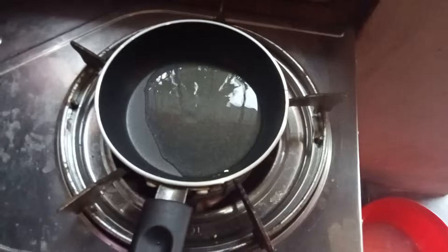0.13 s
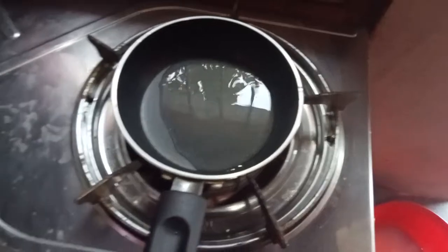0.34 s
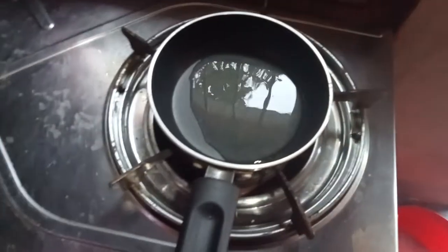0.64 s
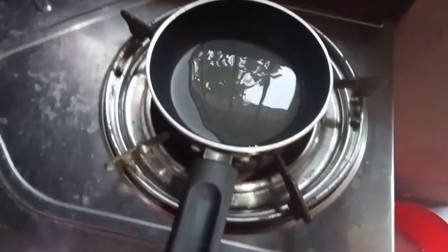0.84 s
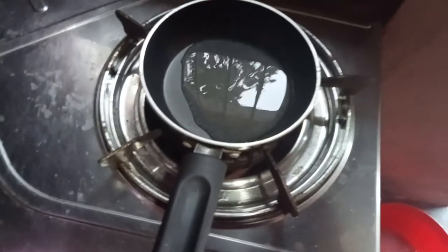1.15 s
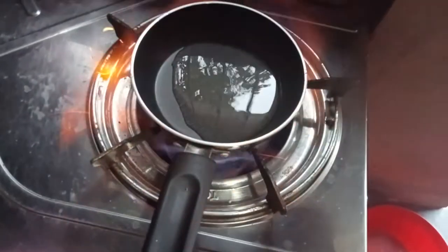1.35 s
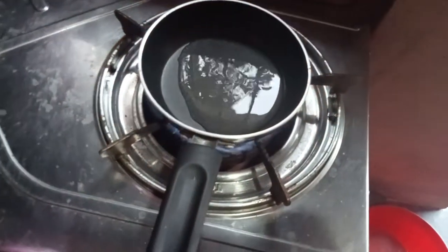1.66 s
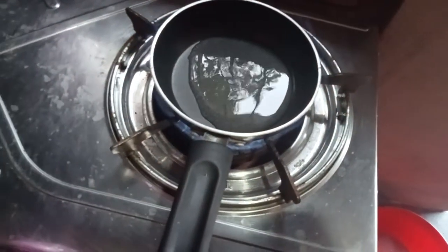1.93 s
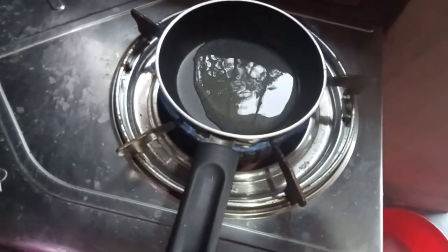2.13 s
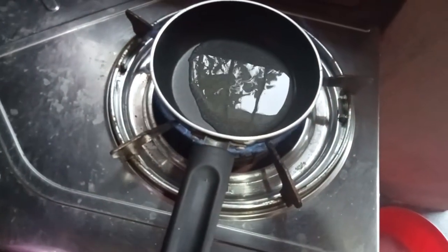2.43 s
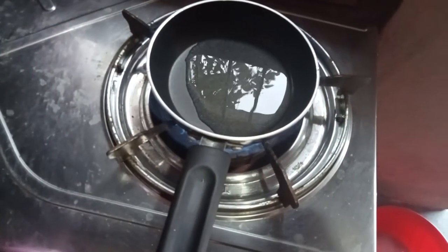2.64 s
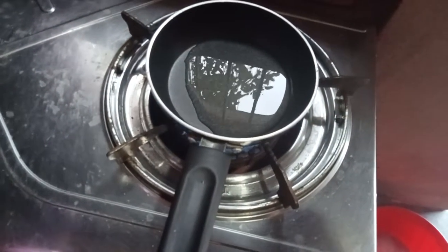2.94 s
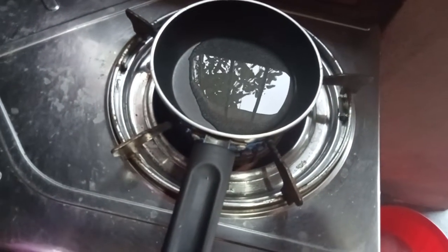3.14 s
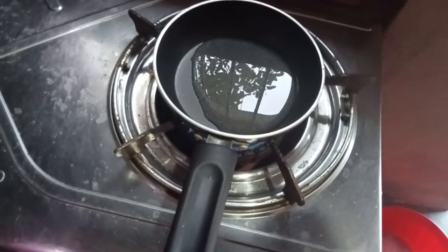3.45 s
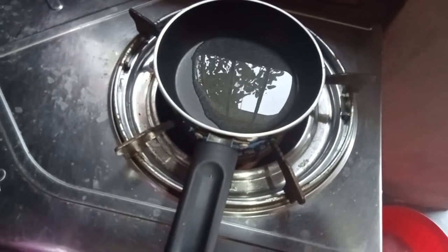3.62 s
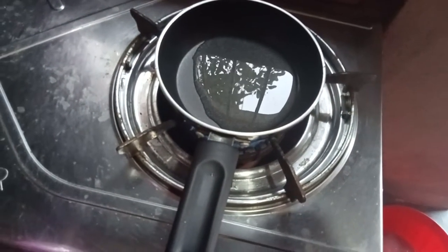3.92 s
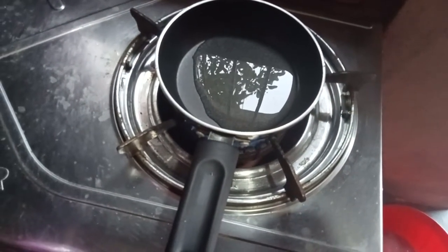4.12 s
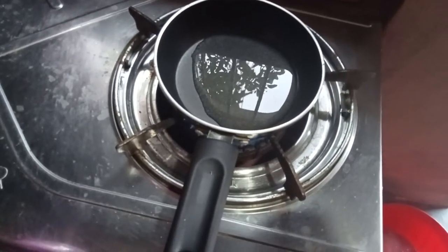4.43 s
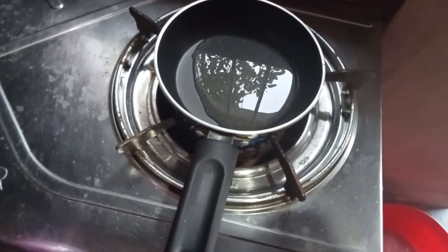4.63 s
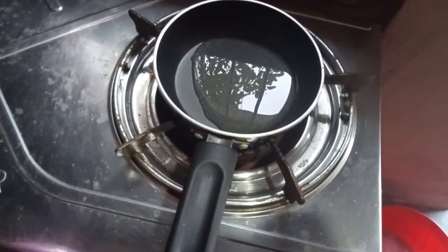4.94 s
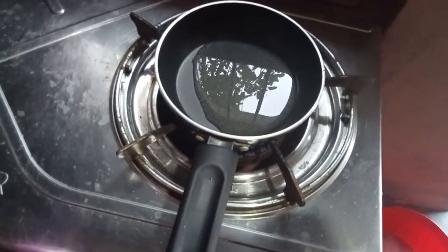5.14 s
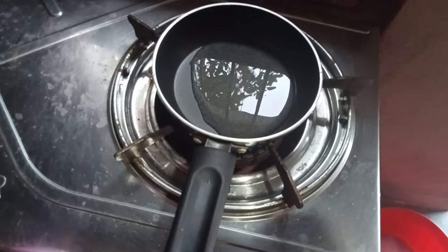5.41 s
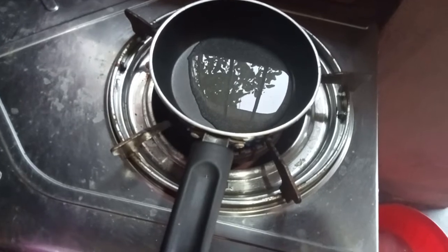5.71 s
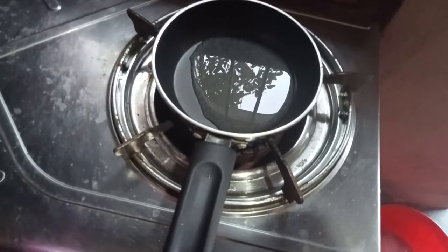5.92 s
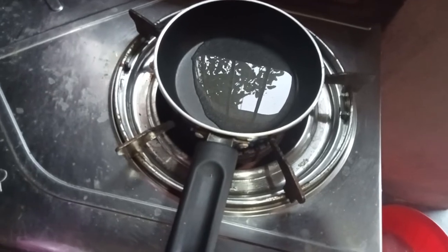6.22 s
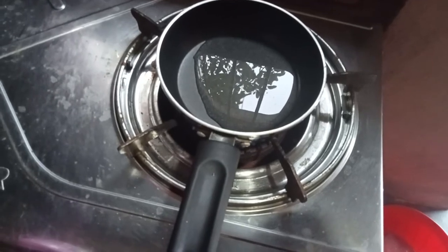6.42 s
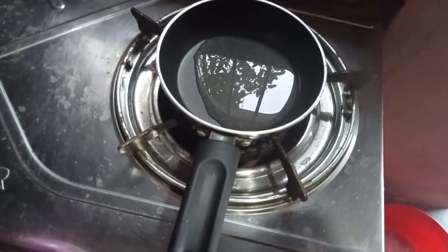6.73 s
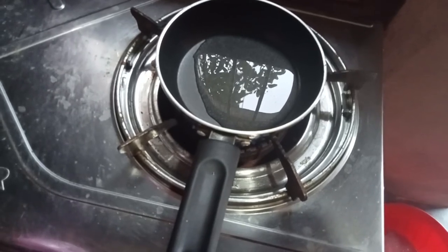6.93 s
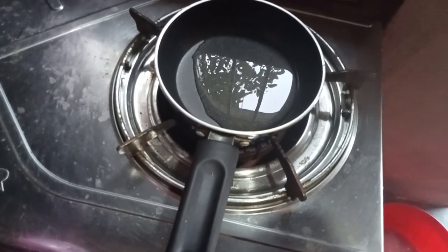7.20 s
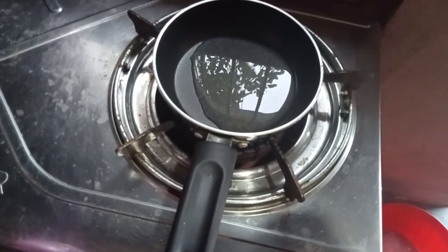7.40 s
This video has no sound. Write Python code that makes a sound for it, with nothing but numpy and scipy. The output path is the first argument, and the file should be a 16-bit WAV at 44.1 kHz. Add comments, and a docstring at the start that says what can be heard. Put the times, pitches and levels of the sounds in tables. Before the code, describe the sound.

The sound fades in from silence over soft indoor air and a faint low hum. From about 0.3 seconds gas hiss climbs, full by 0.9, bright and airy with a thin whistle near 6 kHz; a faint knock falls at 0.5 and a small metal tick at 1.17. At 1.29 the igniter snaps extremely loudly, two blows almost fused, with dense clanging steel ring. At 1.39 gas catches in a deep, short whump and low roar. A firm dull knob knock comes at 1.57 as the ringing is damped. Flame and hiss sink through 2 to 4 seconds, leaving quiet air. Birds outside whistle, chip and squawk hoarsely from about 1.1 onward, clearer after the ignition, sparser around 4 to 4.8, livelier from 5.2 to 6.3, and continuing to 7.5. Faint handling knocks occur at 2.65 and 3.9; tiny bright ticks cluster at 7.1 to 7.3.

```python
"""In a home kitchen, a gas stove is lit under a small pan; birds call outside.
Gas hiss and jet whistles are filtered noise that swells and dies with the flow. The igniter's blows are
bursts of dense ringing plus steel modes; the flame is a whump of air modes and a roar of low noise.
Whistles, chips, chirps and squawks are gliding tones with random jitter, smeared by a room tail.
Knob, pan and metal add short bursts of noise, over a soft background with drones and a low hum."""
import sys
import numpy as np
from scipy import signal
from scipy.fft import rfft, irfft
from scipy.io import wavfile
from scipy.ndimage import uniform_filter1d, minimum_filter1d

SR = 44100
rng = np.random.default_rng(int(sys.argv[2]) if len(sys.argv) > 2 else 0)


def store_pcm(level_fs):
    """Save levels as 16-bit WAV."""
    pcm = np.round(np.clip(level_fs, -1, 1) * 32767).astype(np.int16)
    wavfile.write(sys.argv[1], SR, np.atleast_2d(pcm).T)


N = 333396
TIME = np.arange(N) / SR

# soft air of house and yard: f/Hz, level/dB per Hz
AIR_COLOUR = [(25, -22.5), (45, -15), (65, -3.5), (160, -2), (350, -5.5), (600, -8), (950, -11),
              (1550, -12), (2100, -10), (3400, -13), (5000, -17.5), (7800, -19), (9000, -31), (15500, -31)]
# narrow bands that sing in the background: f/Hz, width/Hz, level/dB
DRONE_BANDS = [(120.4, 14, -80), (287.7, 36, -79), (645.8, 40, -85), (734, 30, -85), (1270, 200, -77.5),
               (4510, 130, -79), (5580, 180, -80.5)]
AIR_DB = -64
# one lull in the air and drones
LULL_S, LULL_WIDTH_S, LULL_DB = 4.45, 0.51, -3.5
# the low hum holds briefly, then sinks to a faint floor
HUM_HZ, HUM_DB, HUM_EASE_S, HUM_FALL_DB_PER_S, HUM_STEADY_DB = 68, -68.5, 0.6, 25, -83

# whistling resonances of the jet and mixing tube: f/Hz, width/Hz, level/dB
JET_RESONANCES = [(1107.4, 430, -13.5), (1920, 140, -17), (2470, 300, -15), (3141, 230, -19),
                  (4320, 150, -13), (5380, 170, -14), (5914, 240, 0), (6180, 140, -8.5), (7000, 1000, -11),
                  (11380, 540, -17.5), (12970, 1800, -16)]
# broad hiss of the gas: f/Hz, level/dB per Hz
HISS_COLOUR = [(300, -13.5), (1000, -5), (3600, -6.5), (5000, 0), (7500, 3), (9000, -11.5), (10200, -12),
               (15500, -8)]
# thin sizzle of the burner ports: f/Hz, width/Hz, level/dB
PORT_BANDS = [(11290, 500, 0.5)]
# the valve opens, the flow stays full for a while, then dies down to a faint steady hiss
GAS_FULL_S, GAS_EASE_S, GAS_DB, GAS_STEADY_DB = 0.94, 1.5, -55, -83
GAS_RISE_DB_PER_S, GAS_FALL_DB_PER_S = 28.5, 6.5
# the ports sizzle from the whump until the flame has settled, then fade
PORTS_DB, PORTS_SETTLED_S, PORTS_FALL_DB_PER_S = -69.5, 2.35, 32

# dull knocks of knob and pan: t/s, level/dB
KNOCK_HITS = [(0.505, -57), (1.569, -33), (2.653, -54.5), (3.901, -57.5), (3.935, -60.5)]
KNOCK_HZ, KNOCK_OCTAVES, KNOCK_T60_S = 2100, 0.59, 0.11
# tiny bright ticks of the metal: t/s, level/dB, f/Hz
METAL_TICKS = [(1.167, -49, 8900), (3.903, -62, 10930), (7.070, -65.5, 13500), (7.161, -50, 13500),
               (7.240, -62, 7000), (7.279, -58, 6370)]
TICK_OCTAVES, TICK_T60_S = 0.3, 0.0195

# hoarse squawks: t/s, length/s, middle f/Hz, level/dB, rasp/0-1, level step per overtone/dB
SQUAWK_CALLS = [(1.097, 0.075, 2905, -52, 0.68, 1), (1.768, 0.054, 1928, -51, 0.98, 0),
                (2.92, .12, 2273, -56, 0.76, 2.5), (3.021, .053, 2398, -47.5, 0.79, 0),
                (3.251, .1, 3540, -56.5, 0.52, -4.5), (3.34, .058, 2056, -54.5, .9, -17),
                (3.605, 0.067, 3870, -57, 0.87, -14), (4.332, 0.076, 2130, -62, .7, -17),
                (5.201, 0.036, 3947, -48, 0.02, -1), (5.218, 0.06, 2990, -53.5, 0.93, -5.5),
                (5.7, .25, 1990, -62.5, .7, -3), (5.82, 0.19, 4650, -63, 1, -8),
                (5.975, 0.059, 2010, -52.5, 0.97, 1.5), (6.124, 0.087, 4610, -56, 0.75, -17),
                (6.163, 0.038, 2936, -52, 0.64, -7.5), (6.182, 0.077, 3690, -52, 0.75, -3.5),
                (7.505, 0.062, 3275, -53, 0.5, -7)]
SQUAWK_FALL_OCTAVES = 0.28  # at full rasp
# sliding whistles: t/s, length/s, held f/Hz, start above held pitch/octaves, level/dB, rasp/0-1
WHISTLE_CALLS = [(1.1, .22, 4570, -0.12, -54.5, 0.27), (1.424, .18, 4411, 0, -52, 0.07),
                 (1.827, .11, 3800, 0.021, -56, 0.14), (1.911, 0.17, 4930, -0.21, -57.5, 0.21),
                 (2.2, .12, 3600, 0.1, -57, 0.37), (2.51, 0.21, 3970, .06, -60, .6),
                 (2.73, 0.24, 4040, -.04, -62, 0.68), (2.839, 0.085, 2480, 0.034, -60.5, 0.48),
                 (3.079, 0.08, 2420, .03, -61.5, 0.5), (3.119, .1, 2800, -.05, -61.5, 0.52),
                 (4.334, 0.068, 1323, 0.058, -67.5, .4), (4.638, .13, 2000, 0.2, -66, 0.33),
                 (4.801, .16, 1930, 0.34, -65.5, 0.46), (4.845, 0.34, 4690, -.2, -58, .26),
                 (5.253, 0.2, 4250, 0.13, -65, .35), (5.273, 0.038, 2206, 0.11, -63, .15),
                 (5.485, 0.21, 3900, .015, -64, 0.15), (5.602, 0.15, 5170, -.42, -54.5, 0.13),
                 (5.893, .12, 3740, -.04, -54, 0.7), (6.209, 0.068, 4003, -0.011, -52.5, 0.36),
                 (6.299, 0.54, 3800, 0.069, -66, 0.6), (6.35, 0.49, 3000, 0.11, -71, 0.6),
                 (6.978, .11, 2865, 0.047, -62.5, 0.8), (7.156, 0.15, 3730, 0.0035, -60, 0.22),
                 (7.311, .12, 4400, 0.17, -57.5, .23), (7.399, .12, 3200, -0.06, -66.5, 0.87)]
SLIDE_SHARE = 0.55  # share of a whistle that the slide takes
# short falling chips: t/s, last f/Hz, level/dB
CHIP_CALLS = [(1.648, 4480, -52), (1.832, 2980, -53.5), (2.36, 4030, -62), (2.401, 2750, -57),
              (2.535, 3340, -58.5), (2.665, 3240, -57), (2.865, 3120, -57), (3.22, 2980, -58),
              (3.29, 2686, -49.5), (3.645, 2520, -52), (5.185, 4470, -48.5), (6.236, 2595, -54),
              (6.858, 2800, -56.5), (6.93, 2240, -62.5), (6.975, 1780, -62)]
CHIP_S, CHIP_FALL_OCTAVES, CHIP_CURVE, CHIP_RASP = 0.052, 0.24, 1.6, 0.21
# husky rising chirps, all around one pitch: t/s, level/dB
CHIRP_CALLS = [(5.155, -54.5), (6.769, -67), (6.894, -56.5), (7.079, -57)]
CHIRP_S, CHIRP_HZ, CHIRP_RISE_OCTAVES, CHIRP_RASP = 0.066, 4880, 0.168, 0.52

# blows of the igniter's spring hammer: t/s, level/dB
HAMMER_BLOWS = [(1.288, -0.5), (1.294, 0)]
# dense ring of the stove body: f/Hz, level/dB per Hz, t60/s
BODY_RING = [(80, -23.5, 0.22), (300, -15, 0.54), (840, -13, .3), (1360, -11, 0.3), (1990, -5, 0.19),
             (2680, 0, 0.21), (4200, -4, 0.13), (5300, -4.5, 0.16), (6128, -9, 0.16), (7180, 3, .14),
             (9570, -13, 0.15), (13130, -8.5, 0.17), (15500, -15.5, 0.15)]
# modes of the igniter's spring, stove top, pan support and pan: f/Hz, level/dB, t60/s
STEEL_MODES = [(500, -8, 0.39), (1626, -15, 0.2), (1835, -5, 0.13), (1887, 0.5, 0.24), (1943, -12, 0.25),
               (2050, -7, .14), (2322, -2.5, .17), (2485, -16, 0.6), (2674, -5, 0.25), (2821, -5, .17),
               (3120, -4, 0.11), (3445, -7, 0.15), (3636, -23.5, 0.79), (3930, -10, .17), (4650, -6, 0.14),
               (5180, -9, .18), (6655, -9, .17), (7067, 0, 0.093), (7327, -2, .12), (7836, -1, .1),
               (8397, -8, 0.11), (9800, -9, .12), (11350, -22, 0.43), (13000, -9, 0.11), (13651, -7, .12)]

# air modes around the burner as the gas catches: f/Hz, level/dB, t60/s
WHUMP_MODES = [(113, 1.5, 0.19), (142, -17, 0.19), (218, -0.5, 0.14), (263.2, 0, 0.21), (328, -13, 0.1),
               (509.2, -21, 0.51)]
# colour of the roar: f/Hz, level/dB per Hz
ROAR_COLOUR = [(30, -25), (85, -17), (125, 2), (170, -9), (260, -16.5), (500, -21.5), (1000, -25),
               (3000, -56)]
WHUMP_S = 1.385
# a flare leaps up with the whump and dies quickly, leaving a softer burn that fades more slowly
FLAME_DB, FLAME_RISE_DB_PER_S, FLAME_FALL_DB_PER_S = -35, 2200, 48.5
BURN_DB, BURN_FALL_DB_PER_S = -55.5, 16.5

# reverberation of the kitchen: f/Hz, t60/s
KITCHEN_T60 = [(200, 0.25), (2000, 0.46), (5000, 0.4), (12000, .25)]
FADE_IN_S, FADE_IN_RISE_S = 0.11, 0.21  # silent until the first, then opening with the second
EDGE_HZ = 15650  # upper edge of the whole sound


def gain_of(db):
    """Decibels to amplitude."""
    return 10 ** (np.asarray(db) / 20)


def evened(x):
    """Scales to an rms of one."""
    return x / np.sqrt(np.mean(x ** 2) + 1e-20)


def read(points, hz):
    """Reads a table along a log-frequency axis."""
    f, value = np.transpose(points)
    return np.interp(np.log(hz + 1), np.log(f), value)


def add(mix, s, sound):
    """Mixes a sound in at time s."""
    part = mix[round(s * SR):][:len(sound)]
    part += sound[:len(part)]


def noise(shape, size=N):
    """Noise of unit rms whose amplitude spectrum follows shape(Hz)."""
    spectrum = rfft(rng.standard_normal(size))
    return evened(irfft(spectrum * shape(np.fft.rfftfreq(size, 1 / SR)), size))


def coloured(colour, size=N):
    """Noise of unit rms with the colour of a table."""
    return noise(lambda hz: gain_of(read(colour, hz)), size)


def wander(rate_hz, size=N):
    """Smooth random drift, mostly slower than the given rate."""
    return noise(lambda hz: 1 / (1 + (hz / rate_hz) ** 4), size)


def fuzzy(bands):
    """Noise ringing in a set of resonances."""
    out = np.zeros(N)
    for centre, width, db in bands:
        out += gain_of(db) * noise(lambda hz: 1 / (1 + ((hz - centre) / (width / 2)) ** 2))
    return out


def mottled(x, patchy_db):
    """Lets small patches of the spectrum swell and fade on their own."""
    z = signal.stft(x, nperseg=1024, noverlap=768)[2]
    patches = uniform_filter1d(rng.standard_normal(z.shape), size=4, axis=0)  # across frequency
    patches = evened(uniform_filter1d(patches, size=14, axis=1))  # along time
    return signal.istft(z * gain_of(patchy_db * patches), nperseg=1024, noverlap=768)[1][:N]


def swell(full_s, ease_s, rise_db_per_s, fall_db_per_s):
    """Gain that climbs to one at full_s, holds until ease_s, then dies away."""
    rise_db = -rise_db_per_s * np.maximum(full_s - TIME, 0)
    fall_db = -fall_db_per_s * np.maximum(TIME - ease_s, 0)
    return gain_of(rise_db + fall_db)


def onset(rise_s):
    """One second of gain that opens with the given time constant."""
    return 1 - np.exp(-TIME[:SR] / rise_s)


def dying(colour, t60s):
    """One second of dense ringing of unit energy, each band dying at its own speed."""
    hz, t, z = signal.stft(coloured(colour, SR), SR, nperseg=256)
    decay_db = -60 * t / read(t60s, hz)[:, None]
    tail = signal.istft(z * gain_of(decay_db), SR, nperseg=256)[1][:SR]
    return tail / np.linalg.norm(tail)


def ring(modes):
    """One second of struck modes: decaying sines with random phases."""
    t = TIME[:SR]
    out = np.zeros(SR)
    for hz, db, t60 in modes:
        out += gain_of(db - 60 * t / t60) * np.sin(2 * np.pi * (hz * t + rng.random()))
    return out


def contact(centre_hz, octaves, t60):
    """A short, damped burst of noise in one band."""
    t = TIME[:SR // 4]
    burst = noise(lambda hz: 1 / (1 + (np.log2((hz + 1) / centre_hz) / octaves) ** 6), size=len(t))
    return burst * gain_of(-60 * t / t60)


def progress(length):
    """Runs from 0 to 1 over a note."""
    return np.linspace(0, 1, max(round(length * SR), 64))


def syrinx(hz, jitter, jitter_hz):
    """Phase of one note: its pitch curve, shaken by random jitter."""
    return 2 * np.pi * np.cumsum(hz * (1 + jitter * wander(jitter_hz, size=len(hz)))) / SR


def harsh_note(hz, rasp, slope_db, jitter=0.14, taper=0.6, shake=0.4):
    """Three partials whose pitch and strength shake so fast that each spreads into a band."""
    phase = syrinx(hz, jitter * rasp, jitter_hz=604)
    stack = np.sin(phase) + gain_of(slope_db) * np.sin(2 * phase)
    stack += gain_of(2 * slope_db - 4) * np.sin(3 * phase)
    shaken = stack * (1 + shake * wander(200, size=len(hz)))
    return evened(shaken) * signal.windows.tukey(len(hz), taper)


def pure_note(hz, rasp, jitter=0.056, overtone_db=-26, taper=0.3, quaver_db=9):
    """A note with a faint octave, from pure to husky; the husky ones quaver in strength."""
    phase = syrinx(hz, jitter * rasp, jitter_hz=256.5)
    quaver = gain_of(quaver_db * rasp * wander(35, size=len(hz)))
    tone = np.sin(phase) + gain_of(overtone_db) * np.sin(2 * phase)
    return evened(quaver * tone) * signal.windows.tukey(len(hz), taper)


def background(flutter_db=0.43):
    """Soft rumble and air of the house and the yard, with faint drones and a sinking hum."""
    air = gain_of(AIR_DB) * coloured(AIR_COLOUR) + fuzzy(DRONE_BANDS)
    lull_db = LULL_DB * np.exp(-((TIME - LULL_S) / LULL_WIDTH_S) ** 2)
    air_gain = gain_of(flutter_db * wander(5.3) + lull_db)
    hum_gain = gain_of(HUM_DB - HUM_FALL_DB_PER_S * np.maximum(TIME - HUM_EASE_S, 0))
    hum_gain += gain_of(HUM_STEADY_DB)
    hum = hum_gain * np.sin(2 * np.pi * HUM_HZ * TIME + 0.5 * wander(4.9))
    return air_gain * mottled(air, patchy_db=2.5) + hum


def gas(hiss_db=-3):
    """Turbulence at the jet: fuzzy whistles and broad hiss follow the flow; the lit ports sizzle."""
    flow = gain_of(GAS_DB) * swell(GAS_FULL_S, GAS_EASE_S, GAS_RISE_DB_PER_S, GAS_FALL_DB_PER_S)
    flow = np.maximum(flow, gain_of(GAS_STEADY_DB))
    jet = fuzzy(JET_RESONANCES) + gain_of(hiss_db) * coloured(HISS_COLOUR)
    ports_gain = swell(WHUMP_S, PORTS_SETTLED_S, FLAME_RISE_DB_PER_S, PORTS_FALL_DB_PER_S)
    ports = gain_of(PORTS_DB) * ports_gain * fuzzy(PORT_BANDS)
    return mottled(flow * jet + ports, patchy_db=2.0)


def knocks():
    """Knob and pan knock dully: damped noise bursts in one middle band."""
    out = np.zeros(N)
    for s, db in KNOCK_HITS:
        add(out, s, gain_of(db) * contact(KNOCK_HZ, KNOCK_OCTAVES, KNOCK_T60_S))
    return out


def squawks():
    """Hoarse calls: the rougher they are, the more they sag in pitch."""
    out = np.zeros(N)
    for s, length, hz, db, rasp, slope_db in SQUAWK_CALLS:
        pitch = hz * 2 ** (SQUAWK_FALL_OCTAVES * rasp * (0.5 - progress(length)))
        add(out, s, gain_of(db) * harsh_note(pitch, rasp, slope_db))
    return out


def whistles():
    """Notes that slide onto their pitch and hold it."""
    out = np.zeros(N)
    for s, length, hz, slide, db, rasp in WHISTLE_CALLS:
        remaining = np.maximum(1 - progress(length) / SLIDE_SHARE, 0)
        pitch = hz * 2 ** (slide * remaining ** 2)
        add(out, s, gain_of(db) * pure_note(pitch, rasp))
    return out


def ticks():
    """The metal ticks: very short noise bursts in narrow, bright bands."""
    out = np.zeros(N)
    for s, db, hz in METAL_TICKS:
        add(out, s, gain_of(db) * contact(hz, TICK_OCTAVES, TICK_T60_S))
    return out


def igniter(body_db=26, modes_db=-9, crack_db=7, crack_s=0.0066, release_s=1.57, damping_db_per_s=250):
    """The hammer strikes with a hard crack, then the steel rings until the knob is let go."""
    out, body = np.zeros(N), np.array(BODY_RING)
    strike = onset(0.0016) * (1 + gain_of(crack_db) * np.exp(-TIME[:SR] / crack_s))
    for s, db in HAMMER_BLOWS:
        add(out, s, gain_of(db + body_db) * dying(body[:, :2], body[:, ::2]) * strike)
    first_blow_s = HAMMER_BLOWS[0][0]
    add(out, first_blow_s, gain_of(modes_db) * ring(STEEL_MODES) * onset(0.003))
    return out * gain_of(-damping_db_per_s * np.clip(TIME - release_s, 0, 1))


def flame(whump_db=-16, spread_s=0.0063, flutter_db=1.0):
    """The pooled gas catches at once and rings the air under the pan; the roar then dies away."""
    lit_s = WHUMP_S + spread_s
    flare = gain_of(FLAME_DB) * swell(lit_s, lit_s, FLAME_RISE_DB_PER_S, FLAME_FALL_DB_PER_S)
    burn = gain_of(BURN_DB) * swell(lit_s, lit_s, FLAME_RISE_DB_PER_S, BURN_FALL_DB_PER_S)
    out = (flare + burn) * gain_of(flutter_db * wander(3.4)) * coloured(ROAR_COLOUR)
    add(out, WHUMP_S, gain_of(whump_db) * ring(WHUMP_MODES) * onset(0.0015))
    return out


def chips(overtone_db=-19):
    """Short notes that all drop alike onto their last pitch."""
    out = np.zeros(N)
    for s, hz, db in CHIP_CALLS:
        pitch = hz * 2 ** (CHIP_FALL_OCTAVES * (1 - progress(CHIP_S)) ** CHIP_CURVE)
        add(out, s, gain_of(db) * harsh_note(pitch, CHIP_RASP, overtone_db))
    return out


def chirps(overtone_db=-20):
    """Husky notes that all rise alike through one middle pitch."""
    out = np.zeros(N)
    for s, db in CHIRP_CALLS:
        pitch = CHIRP_HZ * 2 ** (CHIRP_RISE_OCTAVES * (progress(CHIRP_S) - 0.5))
        add(out, s, gain_of(db) * harsh_note(pitch, CHIRP_RASP, overtone_db))
    return out


def through_window(x, corner_hz=8200):
    """Distance and the window opening take off the top treble."""
    hz = np.fft.rfftfreq(N, 1 / SR)
    return irfft(rfft(x) / np.sqrt(1 + (hz / corner_hz) ** 12), N)


def kitchen(x, direct_db, room_db):
    """The direct sound plus the tail of a small, hard-walled room."""
    flat = [(100, 0), (15000, 0)]
    tail = dying(flat, KITCHEN_T60) * onset(0.003)
    return gain_of(direct_db) * x + gain_of(room_db) * signal.fftconvolve(x, tail)[:N]


def low_cut(x, corner_hz=60):
    """Rolls off the deepest bass."""
    return signal.sosfilt(signal.butter(2, corner_hz, "high", fs=SR, output="sos"), x)


def scene():
    """The stove is close and dry; the birds arrive with a strong share of reflections."""
    stove = low_cut(kitchen(igniter() + flame(), direct_db=-2.0, room_db=-27))
    handling = kitchen(knocks() + ticks(), direct_db=-2.0, room_db=-12.5)
    calls = squawks() + whistles() + chips() + chirps()
    birds = kitchen(through_window(calls), direct_db=-3.5, room_db=-2.5)
    return (background() + gas() + handling + birds + stove)[None]


def record(dry, ceiling_db=-10, recovery_db_per_s=85):
    """Fade-in, a look-ahead limiter that ducks just before loud moments and recovers, then a band limit."""
    power_db = 10 * np.log10(abs(uniform_filter1d(dry[0] ** 2, size=400)) + 1e-12)
    headroom_db = np.minimum(ceiling_db - power_db, 0)
    over_db = -minimum_filter1d(headroom_db, size=1300, origin=-650)  # window looks ahead
    fall = TIME * recovery_db_per_s
    held_db = np.maximum.accumulate(over_db + fall) - fall  # steady recovery after each peak
    duck_db = uniform_filter1d(held_db, size=200)
    fade_in = 1 - np.exp(-np.maximum(TIME - FADE_IN_S, 0) / FADE_IN_RISE_S)
    limited = np.clip(fade_in * dry / gain_of(duck_db), -0.95, 0.95)
    band_limit = signal.firwin(511, EDGE_HZ, window=("kaiser", 9), fs=SR)
    return signal.oaconvolve(limited, band_limit[None], "same")


dry = scene()
out = record(dry)
store_pcm(out)
```